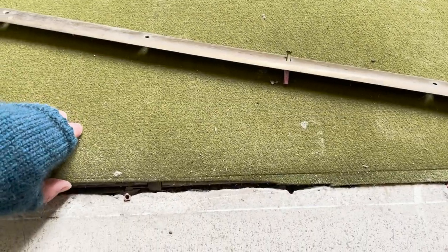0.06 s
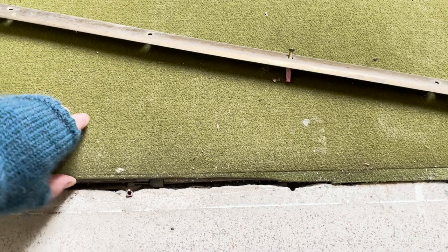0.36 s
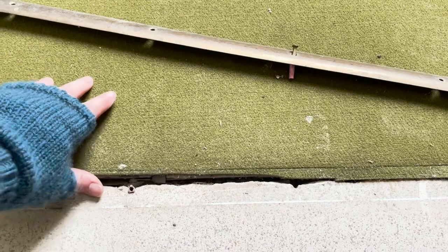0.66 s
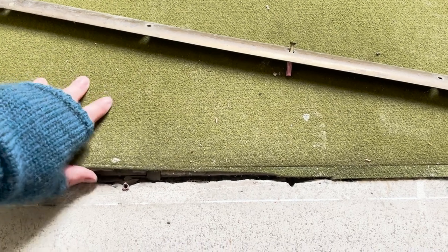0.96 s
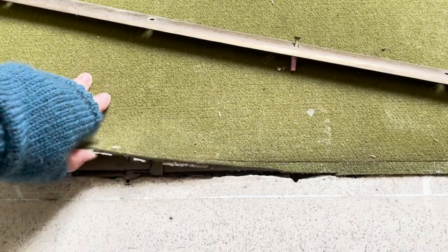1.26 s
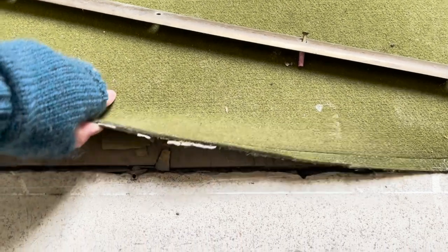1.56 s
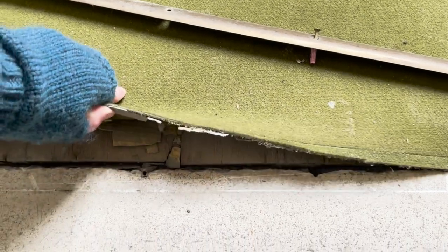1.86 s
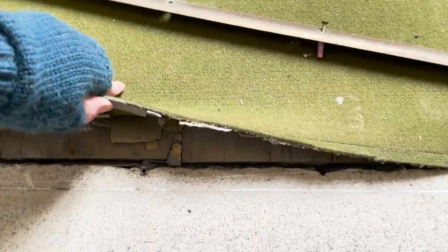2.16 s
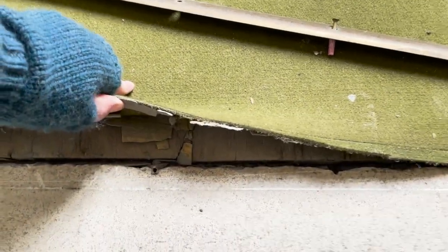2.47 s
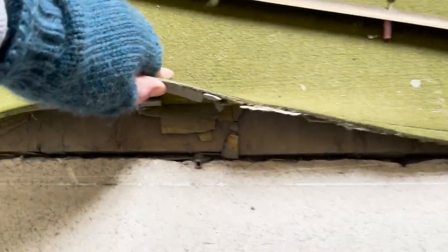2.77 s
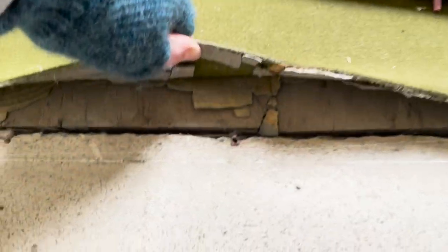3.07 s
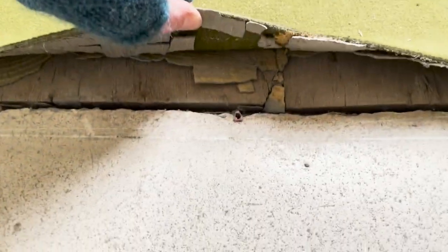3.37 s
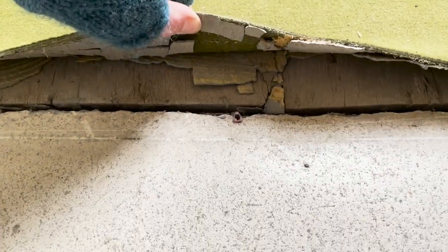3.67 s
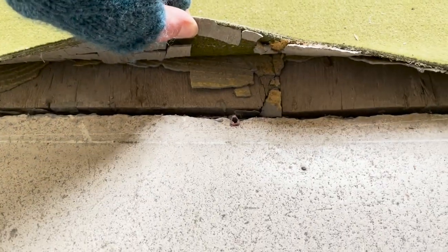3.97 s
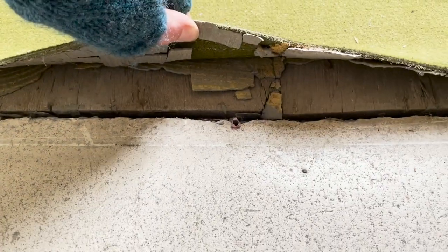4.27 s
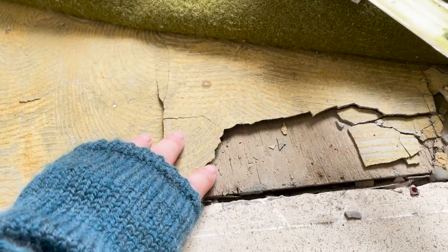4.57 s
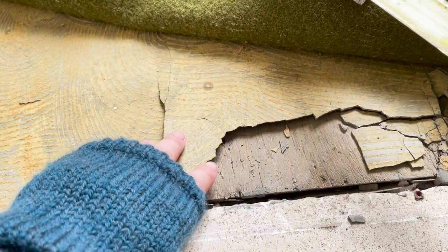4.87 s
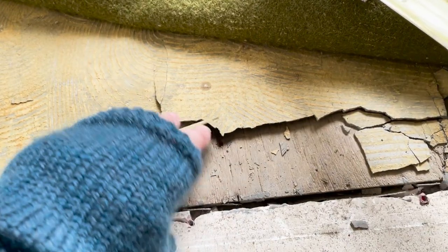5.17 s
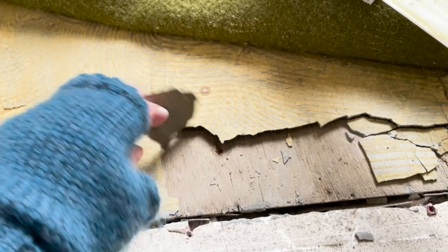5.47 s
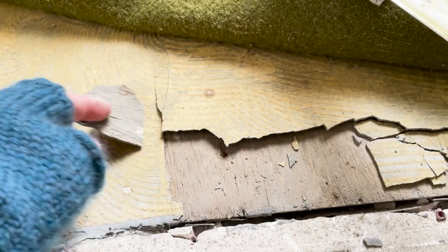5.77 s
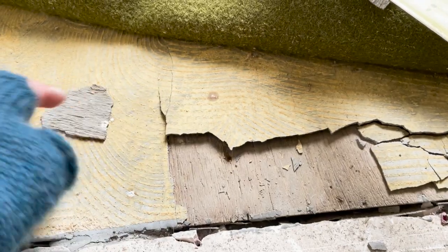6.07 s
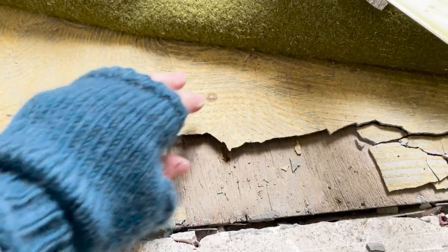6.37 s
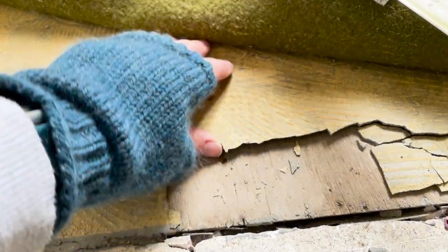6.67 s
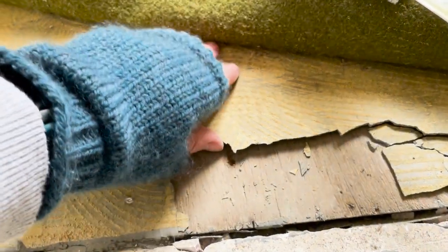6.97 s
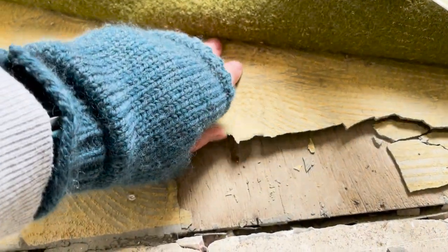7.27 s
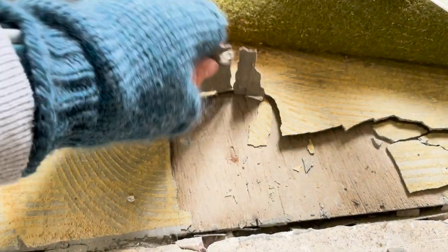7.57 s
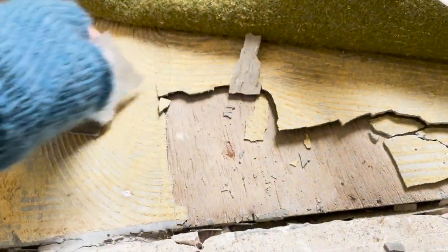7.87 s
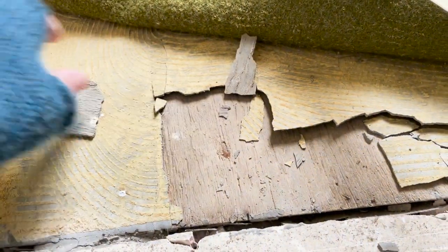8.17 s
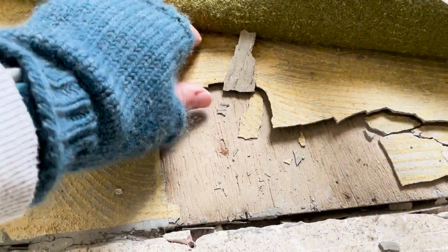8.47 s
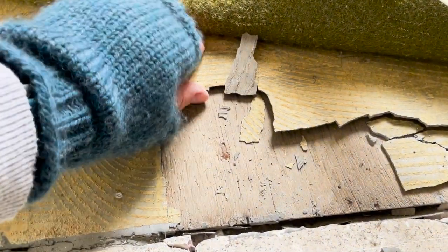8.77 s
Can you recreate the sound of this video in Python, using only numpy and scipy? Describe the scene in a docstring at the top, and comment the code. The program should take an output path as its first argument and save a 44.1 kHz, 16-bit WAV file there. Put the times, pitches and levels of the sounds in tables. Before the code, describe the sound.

Close crackling and tearing of carpet being pulled up with hollow thumps, followed by a hard floor layer cracking and scraping over distant engine drone.

```python
"""Old glued carpet crackles and rips off a wooden floor, close by in a bare room: fibres snap, the glue
lets go in patches and the lifted sheet booms over its hollow. In a second scene a gloved hand prises
brittle flakes from the hard layer beneath, drags one over the boards and snaps off the next. Each break
is an avalanche of tiny cracks that rings the piece coming loose. Behind the flakes two distant engines
drone through the walls, one settling to a steady speed, the other gathering pace."""
import sys
import numpy as np
from scipy import signal
from scipy.fft import rfft, irfft
from scipy.io import wavfile
from scipy.ndimage import uniform_filter1d

SR = 44100
rng = np.random.default_rng(int(sys.argv[2]) if len(sys.argv) > 2 else 0)


def to_wav(s):
    """Save 16-bit WAV."""
    ch = np.atleast_2d(s).T  # columns
    pcm = np.round(np.clip(ch, -1, 1) * 32767)  # PCM
    wavfile.write(sys.argv[1], SR, pcm.astype(np.int16))


N = 388962
TIME, HZ = np.arange(N) / SR, np.fft.rfftfreq(N, 1 / SR)
SCENE_CHANGE_S, BAND_LIMIT_HZ = 4.405, 15950
FIRM_DB = -30  # reference level of a firm push or break

# Patches of glue letting go. Each row: start in seconds, relative level in dB, ring in Hz,
# decay time in seconds.
GLUE_RIPS = [(0.0124, -36.5, 3480, 0.0014), (0.132, -30, 11000, 0.00067), (0.217, -35, 2227, 0.0014),
             (0.495, -46.5, 1170, 0.03), (0.724, -51.5, 2400, 0.022), (1.08, -22, 920, 0.0024),
             (1.128, -27, 2730, 0.035), (1.139, -20.5, 6660, 0.0059), (1.372, -21, 1500, 0.005),
             (1.419, -23, 330, 0.014), (1.511, -20.5, 920, 0.018), (1.523, -21, 2500, 0.0022),
             (1.54, -26.5, 600, 0.0037), (1.59, -20, 496, 0.0033), (1.598, -22.5, 228, 0.0049),
             (1.75, -25.5, 2770, 0.0017), (1.811, -24.5, 1620, 0.0044), (1.974, -25.5, 2000, 0.00068),
             (2.631, -41, 1755, 0.002), (2.827, -38, 5000, 0.0066), (2.8486, -30, 2320, 0.0047),
             (3.222, -45.5, 649, 0.0052), (3.255, -35.5, 655, 0.0037)]
# Loose pieces striking the boards. Each row: start in seconds, relative level in dB, pitch in Hz.
BOARD_KNOCKS = [(3.258, -41, 249), (4.721, -43, 791), (5.261, -40, 738), (5.349, -45, 663),
                (5.383, -37, 767), (5.42, -37, 643), (5.546, -37.5, 740), (5.985, -36, 710),
                (6.021, -28, 738), (7.343, -35, 1660), (7.363, -29, 1570), (7.53, -47, 746),
                (7.584, -41, 620), (7.697, -39, 673)]
# Direct sound at the two microphone ports. Each row: frequency in Hz, left minus right level in dB.
PORT_BALANCE = [(150, 0), (500, 3.5), (1000, 4.5), (2700, 1.5), (5000, 1.5), (8000, 1)]


def amp(db):
    """Amplitude ratio of a level in decibels."""
    return 10 ** (np.asarray(db) / 20)


def unit(x):
    """Normalisation to an rms of 1."""
    return x / np.sqrt(np.mean(x ** 2) + 1e-20)


def read(points, hz):
    """Interpolation of a table on a logarithmic frequency axis."""
    f, value = np.transpose(points)
    return np.interp(np.log(hz + 1), np.log(f + 1), value)


def bump(hz, centre_hz, octaves):
    """A resonance peak of height 1, with its half-width in octaves."""
    return 1 / (1 + (np.log2((hz + 1) / centre_hz) / octaves) ** 2)


def low_cut(hz, edge_hz):
    """Radiation loss in dB: small bodies radiate little bass."""
    return -10 * np.log10(1 + (edge_hz / (hz + 10)) ** 4)


def dulled(hz, dull_hz):
    """Absorption as a gain: reflections lose their treble."""
    return 1 / np.sqrt(1 + (hz / dull_hz) ** 8)


def colour(x, shape_db):
    """Minimum-phase filtering by a gain in dB given as a function of frequency."""
    log_gain = np.log(amp(shape_db(abs(np.fft.fftfreq(2048, 1 / SR)))))
    taps = np.fft.ifft(np.exp(np.conj(signal.hilbert(log_gain)))).real
    return signal.oaconvolve(x, taps[:len(taps) // 2])[:len(x)]


def noise(spectrum):
    """Stationary noise of a given spectrum."""
    return unit(irfft(rfft(rng.standard_normal(N)) * amp(read(spectrum, HZ) + low_cut(HZ, 25)), N))


def waver(depth_db, rate_hz):
    """Slow random amplitude modulation, as a gain."""
    drift = irfft(rfft(rng.standard_normal(N)) * np.exp(-(HZ / rate_hz) ** 2), N)
    return amp(depth_db * unit(drift))


def strokes(rows, attack_db_per_s, release_db_per_s):
    """Envelopes add in power: each sets in, changes by its swell over its length and dies away."""
    t, power = TIME[::32], 0
    for start, length, db, swell_db in rows:
        progress = np.clip((t - start) / length, 0, 1)
        before, after = np.maximum(start - t, 0), np.maximum(t - start - length, 0)
        fade_db = attack_db_per_s * before + release_db_per_s * after
        power = power + amp(db + swell_db * (progress - .5) - fade_db) ** 2
    return np.interp(TIME, t, np.sqrt(power))


def apart(pair, hz):
    """Spatial coherence: two independent spectra mix so that the ports agree only for long waves."""
    mid, side = pair[0], pair[1] * hz / np.hypot(hz, 500)
    return np.array([mid + side, mid - side]) / np.sqrt(1 + hz ** 2 / (hz ** 2 + 500 ** 2))


def ports(x, phase, early_db, early_s, dull_hz):
    """Multipath: a near sound reaches each port with its own phase, level and early reflections."""
    hz, t = np.fft.rfftfreq(len(x), 1 / SR), np.arange(len(x)) / SR
    left = amp(read(PORT_BALANCE, hz) / 2) * np.exp(.5j * read(phase, hz))
    direct = np.array([left, 1 / left])
    echoes = unit(rng.standard_normal((2, len(x))) * np.exp(-t / early_s) * (1 - np.exp(-2 * t / early_s)))
    paths = direct + amp(early_db) * apart(rfft(echoes), hz) / np.sqrt(len(x)) * dulled(hz, dull_hz)
    return unit(irfft(rfft(x) * paths / np.sqrt(np.mean(abs(direct) ** 2, axis=0))))


def room(x, tail_db, dull_hz):
    """Reverberation: the direct sound is followed by a tail that decays exponentially in each band."""
    # Each row: frequency in Hz, time to decay by 60 dB in seconds.
    reverb_times = [(1200, 0.65), (3000, 0.59), (7000, 0.15), (15000, 0.49)]
    hz, t, spectra = signal.stft(rng.standard_normal((2, SR)), SR, nperseg=256)
    hz = hz[:, None]
    balance = amp(np.multiply.outer([1, -1], read(PORT_BALANCE, hz) / 4))
    envelope = amp(-60 * t / read(reverb_times, hz)) * (1 - np.exp(-t / 0.00095))
    spectra = apart(spectra, hz) * balance * dulled(hz, dull_hz) * envelope
    tail = unit(signal.istft(spectra, SR, nperseg=256)[1]) / np.sqrt(SR)
    return x + amp(tail_db) * signal.fftconvolve(x, tail, axes=1)[:, :N]


def diffuse(spectrum):
    """A diffuse field: noise from all round, whose coherence between the ports follows a sinc law."""
    coherence = np.sinc(HZ / 480)
    mid, side = (irfft(rfft(noise(spectrum)) * np.sqrt((1 + sign * coherence) / 2), N) for sign in (1, -1))
    return np.array([mid + side, mid - side])


def room_tone():
    """The quiet room holds a faint diffuse rumble."""
    # Each row: frequency in Hz, relative spectral density in dB.
    spectrum = [(25, -11), (55, -5), (90, -2), (135, -15), (350, -22.5), (700, -40), (3000, -37.5),
                (14000, -56.5)]
    return amp(-56) * diffuse(spectrum)


def engine(firing_hz, gain, waver_db, throb=0):
    """Transmission loss: only the lowest harmonics of an engine's firing rate pass the walls."""
    # Each row: multiple of the firing rate, relative level in dB.
    harmonics = [(1, -1), (2, -20), (3, -23)]
    phase = 2 * np.pi * np.cumsum(firing_hz) / SR
    drone = sum(amp(db) * waver(waver_db, rate_hz=1.6) * np.sin(k * phase) for k, db in harmonics)
    return np.sqrt(2) * (gain * drone + throb * np.sin(phase / 2))


def street():
    """Two firing rates relax exponentially, one down to idle and one upwards, over muffled tyre rumble."""
    # The waves of each drone, and the steady engine's throb at half its firing rate.
    # Each row: start in seconds, length in seconds, relative level in dB, swell in dB.
    steady_waves = [(4.41, 0.43, -36, -3.5), (5.45, 0.88, -36.5, -0.5), (6.92, 0.11, -37, 2),
                    (7.4, 1.7, -40, -1)]
    rising_waves = [(5.0, 0.74, -31, -2), (7.25, 0.54, -36.5, 4.5), (8.4, 0.65, -29, -1)]
    throbs = [(4.9, 1.91, -42, -0.5)]
    # Each row: frequency in Hz, relative spectral density in dB.
    tyre_spectrum = [(22, -43.5), (42, 5), (95, 2.5), (190, -4.5), (400, -20.5), (2000, -40), (14000, -57)]
    idle_hz, excess_hz, settle_s = 87.13, 3.6, 0.346
    start_hz, top_hz, speed_up_s = 47.25, 76, 2.3
    t = np.maximum(TIME - SCENE_CHANGE_S, 0)
    steady_hz = idle_hz + excess_hz * np.exp(-t / settle_s)
    rising_hz = top_hz + (start_hz - top_hz) * np.exp(-t / speed_up_s)
    waves = lambda rows: strokes(rows, attack_db_per_s=73, release_db_per_s=29.5)
    throb = strokes(throbs, attack_db_per_s=0.5, release_db_per_s=150)
    steady = engine(steady_hz, waves(steady_waves), waver_db=0.64, throb=throb)
    rising = engine(rising_hz, waves(rising_waves), waver_db=3.5)
    return steady + rising + amp(-41.5) * diffuse(tyre_spectrum)


def glove():
    """Friction noise: a woollen glove brushes softly over the floor."""
    # Each row: start in seconds, length in seconds, relative level in dB, swell in dB.
    brushes = [(6.4, 0.46, -51.5, 9.5), (7.1, 1.7, -54, 8.5)]
    # Each row: frequency in Hz, relative spectral density in dB.
    wool_spectrum = [(240, -13.5), (400, -3), (867, -8.5), (4260, -22), (10000, -35.5), (15000, -43.5)]
    return amp(-0.5) * strokes(brushes, attack_db_per_s=42.5, release_db_per_s=54) * diffuse(wool_spectrum)


def knocks(rows, hear, size=8192):
    """Damped modes: a loose flake rocks against the boards and rings, sagging in pitch as it settles."""
    # Each row: multiple of the pitch, relative level in dB, time to decay by 60 dB in seconds.
    modes = [(0.999, 7.5, 0.03), (1.23, -7.5, 0.084), (1.85, -3, 0.039)]
    sag_share, sag_s = 0.095, 0.0024
    out, t = np.zeros((2, N + size)), np.arange(size) / SR
    onset = 1 - np.exp(-t / .001)
    for start, db, hz in rows:
        phase = 2 * np.pi * np.cumsum(hz * (1 + sag_share * np.exp(-t / sag_s))) / SR
        ring = sum(amp(mode_db - 60 * t / t60) * np.sin(phase * k) for k, mode_db, t60 in modes)
        at = round(start * SR)
        out[:, at:at + size] += amp(db) * hear(ring * onset) * np.sqrt(SR / 100 / size)
    return out[:, :N]


def avalanche(length, first_share, size=4096):
    """Acoustic emission: a first crack and a dying rush of uneven ones, whitened to a flat spectrum."""
    t, length = np.arange(size) / SR, max(length, 2 / SR)
    cracks = rng.standard_normal(size) * amp(3.9 * rng.standard_normal(size))
    burst = unit(cracks * np.exp(-(t / length) ** 1.32))
    burst[0] += first_share * np.sqrt(size) * np.exp(-length / 0.002)
    broad_db = 10 * np.log10(uniform_filter1d(abs(rfft(burst)) ** 2, size=200) + 1e-20)
    return unit(colour(burst, lambda f: -np.interp(f, np.fft.rfftfreq(size, 1 / SR), broad_db)))


def crackle(spectrum, effort, hear, per_s, spread_db, grain_s, hiss_db, spots=20):
    """Shot noise: tiny breaks come in clumps from spots that each have a resonance, over a fine hiss."""
    spot_db, clump_db = 11, 2.8
    out = np.zeros((2, N))
    shape = lambda f: read(spectrum, f) + low_cut(f, 190)
    for _ in range(spots):
        sizes = amp(spread_db * np.minimum(rng.exponential(1, N), 2.8))
        activity = np.repeat(rng.exponential(1, N // (SR // 10) + 1), SR // 10)[:N]
        breaks = sizes * (rng.random(N) < activity * per_s / spots / SR)
        spot_hz = 500 * 2 ** rng.uniform(0, 4.5)
        tone = lambda f: shape(f) + spot_db * bump(f, spot_hz, octaves=.07)
        grain = colour(avalanche(grain_s, first_share=.5, size=2048), tone)
        out += signal.oaconvolve(breaks[None], hear(np.roll(grain, 32)), axes=1)[:, :N]
    clumps = amp(clump_db * unit(uniform_filter1d(rng.standard_normal(N), size=260)))
    hiss = unit(hear(colour(rng.standard_normal(N), shape)))
    rough = unit((unit(out) + amp(hiss_db) * hiss) * clumps)
    # A light touch only rubs; things start to break as the effort grows.
    breaking = effort ** 2 / (effort ** 2 + amp(-55) ** 2)
    return effort * (breaking * rough + np.sqrt(1 - breaking ** 2) * hiss)


def brightness(rows, firm_db, per_db, per_octave_db):
    """Spectral tilt: the treble of each break, in dB, follows its level and the pitch of its piece."""
    _, db, ring_hz, _ = np.transpose(rows)
    return firm_db + per_db * (db - FIRM_DB) + per_octave_db * np.log2(ring_hz / 1000)


def fractures(rows, treble, spectrum, hear, bend_s, ring_db, ring_octaves, first_share, size=4096):
    """Impulse excitation: each break is one avalanche that rings the piece coming loose."""
    out, hz = np.zeros((2, N + size)), np.fft.rfftfreq(size, 1 / SR)
    lead = 32  # samples of room ahead of each crack
    # Dispersion: bending-wave speed grows as the root of frequency, so each crack chirps downwards.
    delay = bend_s * np.maximum(np.sqrt(1000 / (hz + 50)) - .3, 0)
    dispersion = np.exp(-2j * np.pi * np.cumsum(delay) * SR / size)
    for (start, db, ring_hz, length), treble_db in zip(rows, treble):
        peak_db = ring_db - 2 * np.log2(ring_hz / 1000)  # small, high pieces ring less
        bass_edge_hz = min(.25 * ring_hz, 517)
        tilt = lambda f: read([(2000, 0.02), (7000, treble_db)], f)
        ring = lambda f: peak_db * bump(f, ring_hz, ring_octaves)
        shape = lambda f: read(spectrum, f) + tilt(f) + ring(f) + low_cut(f, bass_edge_hz)
        burst = colour(avalanche(length, first_share), shape)
        snap = irfft(rfft(burst) * dispersion * (hz < BAND_LIMIT_HZ))
        at = max(round(start * SR) - lead, 0)
        out[:, at:at + size] += amp(db) * hear(np.roll(snap, lead)) * np.sqrt(SR / 100 / size)
    return out[:, :N]


def scraping(flake_spectrum, hear):
    """Sliding friction: a pushed flake grinds and rings, and under a firm push its sharp edge rasps."""
    # Each row: start in seconds, length in seconds, relative level in dB, swell in dB, ring in Hz.
    scrapes = [(4.882, 0.26, -46, -2, 1880), (5.344, 0.2, -41, 3, 720), (5.533, 0.14, -32.5, 4, 1490),
               (5.791, 0.14, -27.5, -2, 5000), (5.96, 0.048, -32, -2.5, 880),
               (6.04, 0.098, -37, -13.5, 1290), (7.341, 0.05, -34, 0.5, 1620),
               (7.477, 0.37, -42.5, -10.5, 694), (8.075, 0.11, -37.5, 4.5, 3700)]
    # Each row: frequency in Hz, relative spectral density in dB.
    grit_spectrum = [(100, -5), (330, 3.5), (600, 3), (950, 1), (1700, -1.5), (2800, -5), (4000, -10.5),
                     (5400, -8.5), (8500, -17.5), (12500, -18), (15500, -11)]
    ring_db, ring_octaves, rasp_exponent = 7.5, 0.28, 1.7
    powers = [strokes([row[:4]], attack_db_per_s=262, release_db_per_s=207.5) ** 2 for row in scrapes]
    total = sum(powers) + 1e-20
    push = np.sqrt(total)
    grit = crackle(grit_spectrum, push, hear, per_s=600, spread_db=5.2, grain_s=.0004, hiss_db=-15)
    grind = 0
    for power, (*_, ring_hz) in zip(powers, scrapes):
        ring = lambda f: ring_db * bump(f, ring_hz, ring_octaves)
        grind = grind + power / total * np.array([colour(port, ring) for port in grit])
    edge = amp(-41.5) * (push / amp(FIRM_DB)) ** rasp_exponent
    rasp = crackle(flake_spectrum, edge, hear, per_s=4000, spread_db=3, grain_s=.0005, hiss_db=-8, spots=6)
    return amp(-7.5) * grind + rasp


def flakes():
    """Brittle fracture: the hard layer snaps and chips, and loose pieces scrape and knock on the boards."""
    # Each row: start in seconds, relative level in dB, ring in Hz, decay time in seconds.
    cracks = [(4.7204, -41, 2850, 0.0016), (4.8264, -37.5, 2190, 0.0018), (4.8931, -38.5, 1880, 0.0084),
              (5.021, -40.5, 890, 0.016), (5.1284, -41, 1640, 0.0023), (5.2598, -42.5, 1470, 0.0011),
              (5.3827, -37.5, 1300, 0.0006), (5.459, -32, 1320, 0.0063), (5.4924, -36.5, 1280, 0.0027),
              (5.7952, -20.5, 1800, 0.0014), (6.0205, -23.5, 1100, 0.0005), (6.0612, -33, 2780, 0.0021),
              (7.1687, -38, 3780, 0.0015), (7.321, -22, 1970, 0.0015), (7.3405, -23.5, 1630, 0.0056),
              (7.3521, -20.5, 2500, 0.0028), (7.3602, -19, 1680, 0.0045), (7.3675, -25, 1620, 0.033),
              (7.383, -25, 1600, 0.0039), (7.4782, -31.5, 5250, 0.0015), (7.5304, -29.5, 785, 0.0073),
              (7.6881, -35, 5460, 0.0098), (7.7365, -34.5, 5570, 0.0026), (8.0472, -38, 3530, 0.00052),
              (8.082, -37, 3700, 0.0079), (8.115, -36, 3630, 0.002), (8.1487, -26, 4000, 0.0018),
              (8.1545, -26.5, 4900, 0.0012), (8.1615, -21, 5070, 0.0021), (8.1971, -30, 1120, 0.0009)]
    # Each row: start in seconds, relative level in dB.
    chips = [(4.868, -46.5), (4.941, -47), (4.968, -51.5), (5.094, -46), (5.349, -48), (5.398, -49),
             (5.681, -46), (5.755, -37.5), (7.198, -46.5), (7.294, -43.5), (7.54, -42), (7.746, -46),
             (7.815, -43.5), (8.639, -48), (8.738, -45.5)]
    # Each row: frequency in Hz, relative spectral density in dB.
    spectrum = [(100, -12.5), (330, 8), (600, 6), (950, 5), (1700, 0.5), (2800, 1), (4000, 2), (5400, 3),
                (8500, 3), (12500, -2.5), (15500, 1.5)]
    # Each row: frequency in Hz, phase lead of the left port in radians.
    port_phase = [(300, 0), (1000, 1), (1900, 0), (5800, 0), (7000, -3.1), (8300, -3.5), (10500, -6.2),
                  (12000, -6.4), (14000, -9.3)]
    chip_hz, chip_s, dull_hz = 2730, 0.0034, 10640
    hear = lambda x: ports(x, port_phase, early_db=-5.5, early_s=0.0019, dull_hz=dull_hz)
    breaks = cracks + [(start, db, chip_hz, chip_s) for start, db in chips]
    treble = brightness(breaks, firm_db=-4.0, per_db=0.5, per_octave_db=2.0)
    snaps = fractures(breaks, treble, spectrum, hear,
                      bend_s=.002, ring_db=11, ring_octaves=.24, first_share=1.4)
    scrapes = scraping(spectrum, hear)
    loose = knocks([row for row in BOARD_KNOCKS if row[0] > SCENE_CHANGE_S], hear)
    return room(snaps + scrapes + loose, tail_db=-12.5, dull_hz=dull_hz)


def boom():
    """Cavity resonance: the lifted sheet heaves over its hollow, and every rip gives it a thump."""
    # Each row: resonance in Hz, bandwidth in Hz, relative level in dB.
    hollow_modes = [(73, 50, 4.5), (110, 15, 14), (178, 10, -3), (233.5, 120, -5.5)]
    # Each row: start in seconds, length in seconds, relative level in dB, swell in dB.
    heaves = [(1.1, 0.087, -36.5, 4), (1.425, 0.048, -28.5, -11), (1.54, 0.11, -32.5, 1),
              (1.67, 0.18, -40.5, -5), (1.99, 0.067, -37.5, -13), (2.86, 0.37, -57, -19),
              (3.49, 0.032, -60, -9), (3.88, 0.19, -64, -0.5)]
    body = sum(amp(db) / (1 + 1j * (HZ ** 2 - hz ** 2) / (width * (HZ + 1)))
               for hz, width, db in hollow_modes)
    bass_band = HZ / (HZ - 60j) / (1 + 1j * HZ / 450) ** 3
    ringing = lambda x: unit(irfft(rfft(x) * body * bass_band, N))
    start, db, ring_hz, _ = np.transpose(GLUE_RIPS)
    thumps = amp(db - 5 * np.log2(ring_hz))  # large, low-ringing patches thump harder
    jolts = np.bincount(np.round(start * SR).astype(int), thumps, N)
    heave = strokes(heaves, attack_db_per_s=905.5, release_db_per_s=122)
    return ringing(rng.standard_normal(N)) * heave + amp(-52.5) * ringing(jolts)


def carpet():
    """Peeling fracture: each tug makes the backing fibres crackle, while the glue rips in patches."""
    # Each row: start in seconds, length in seconds, relative level in dB, swell in dB.
    tugs = [(0, 0.31, -38, 7.5), (1.02, 0.032, -35, 7), (1.12, 0.05, -23, -12), (1.26, 0.075, -35, 7.5),
            (1.39, 0.2, -26.5, 14.5), (1.64, 0.32, -28.5, 4), (2.0, 0.15, -41.5, -13.5),
            (2.64, 0.12, -52, -3.5), (2.85, 0.05, -38.5, -8), (2.9, 0.4, -40, 6), (3.4, 0.44, -56.5, -7.5)]
    # Each row: start in seconds, relative level in dB.
    fibre_snaps = [(.266, -40), (.409, -48.5), (.883, -51), (1.287, -44), (1.362, -37), (1.4967, -40),
                   (1.564, -33), (1.6334, -33), (1.838, -28), (2.82, -42.5), (2.865, -35.5), (2.958, -48),
                   (3.052, -46), (3.114, -41), (3.166, -36.5), (3.196, -45), (3.548, -49.5)]
    # Each row: frequency in Hz, relative spectral density in dB.
    spectrum = [(100, -4), (330, -3.5), (600, -4.5), (950, -3), (1700, -4.5), (2800, -6), (4000, -7),
                (5400, -6), (8500, -5.5), (12500, -14.5), (15500, -2.5)]
    # Each row: frequency in Hz, phase lead of the left port in radians.
    port_phase = [(4500, 0), (6500, 1.6), (10500, 3.1), (13500, 3.2), (16000, 4)]
    fibre_hz, fibre_s = 2970, 0.00078
    dull_hz = 6700  # carpet absorbs more treble than bare boards
    hear = lambda x: ports(x, port_phase, early_db=-0.5, early_s=0.0038, dull_hz=dull_hz)
    pull = strokes(tugs, attack_db_per_s=295, release_db_per_s=174)
    breaks = GLUE_RIPS + [(start, db, fibre_hz, fibre_s) for start, db in fibre_snaps]
    treble = brightness(breaks, firm_db=-0.5, per_db=-0.07, per_octave_db=1.5)
    rips = fractures(breaks, treble, spectrum, hear,
                     bend_s=.005, ring_db=9.5, ring_octaves=.3, first_share=.85)
    fibres = crackle(spectrum, pull, hear, per_s=350, spread_db=6.4, grain_s=.00035, hiss_db=-20)
    loose = knocks([row for row in BOARD_KNOCKS if row[0] < SCENE_CHANGE_S], hear)
    return room(rips + loose + amp(-7.0) * fibres, tail_db=-11.5, dull_hz=dull_hz)


def scene():
    """Superposition in two scenes: first the carpet, then the flakes with the street behind them."""
    crossfade = np.clip((TIME - SCENE_CHANGE_S) * 200, 0, 1)  # lasts 5 ms
    first = carpet() + boom() + room_tone()
    second = flakes() + street() + glove()
    return (1 - crossfade) * first + crossfade * second


def record(dry):
    """Band limiting: a steep low-pass filter removes the highest treble."""
    low_pass = signal.firwin(511, BAND_LIMIT_HZ, window=("kaiser", 9), fs=SR)
    return signal.oaconvolve(dry, low_pass[None], "same")


dry = scene()
out = record(dry)
to_wav(out)
```